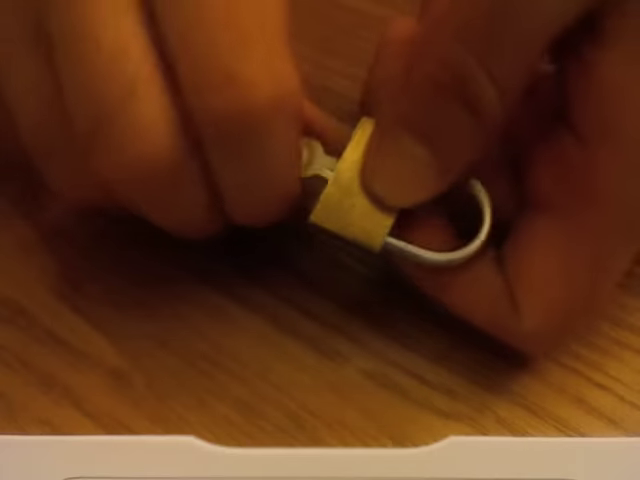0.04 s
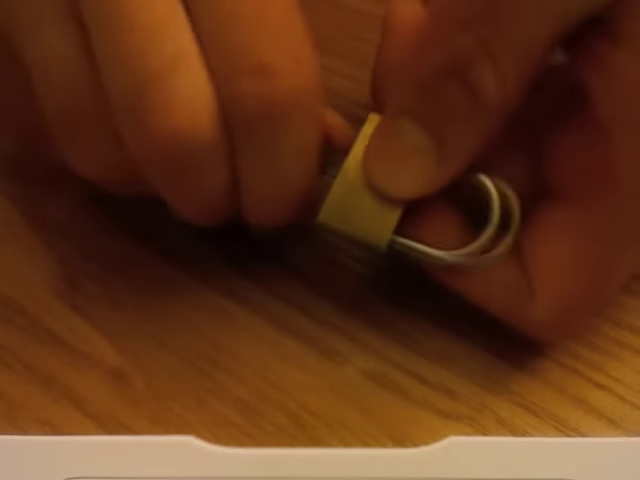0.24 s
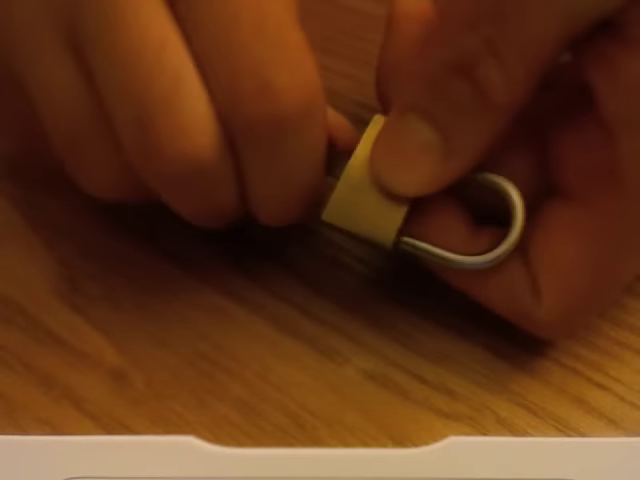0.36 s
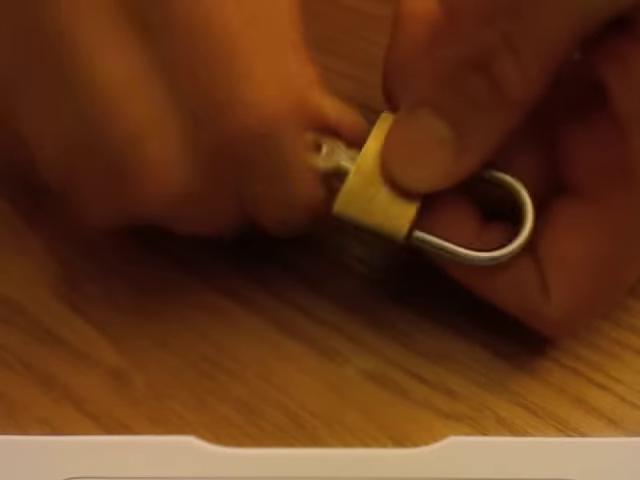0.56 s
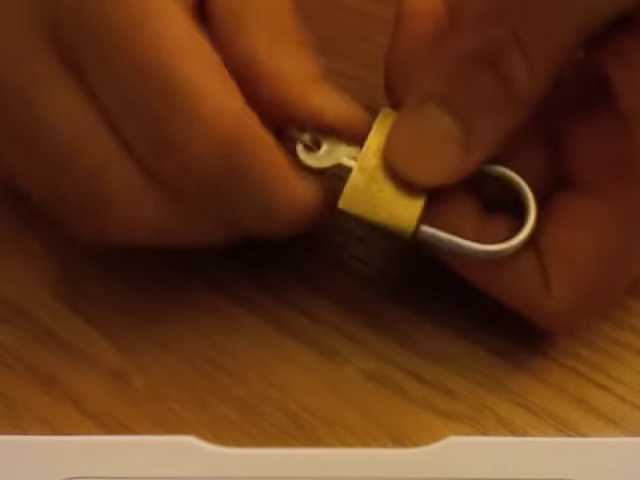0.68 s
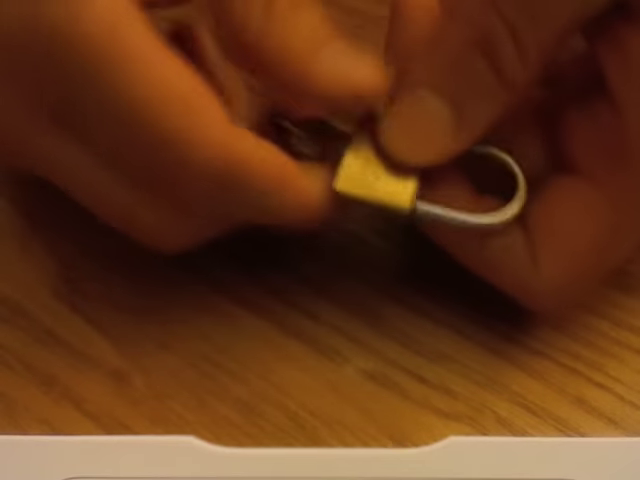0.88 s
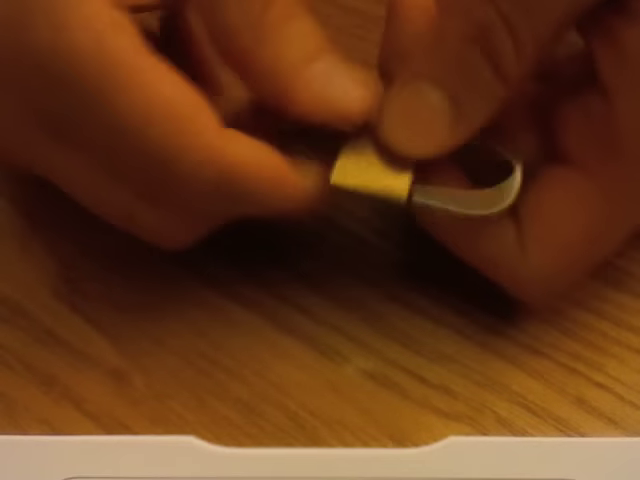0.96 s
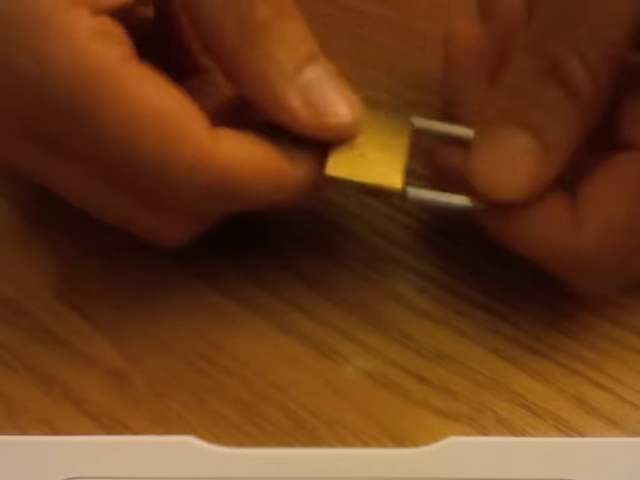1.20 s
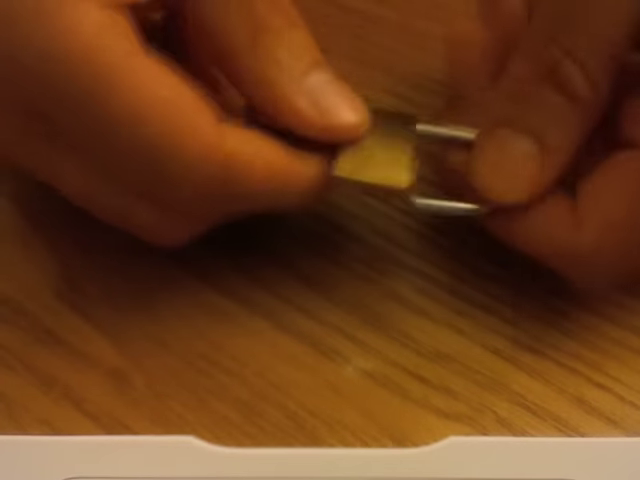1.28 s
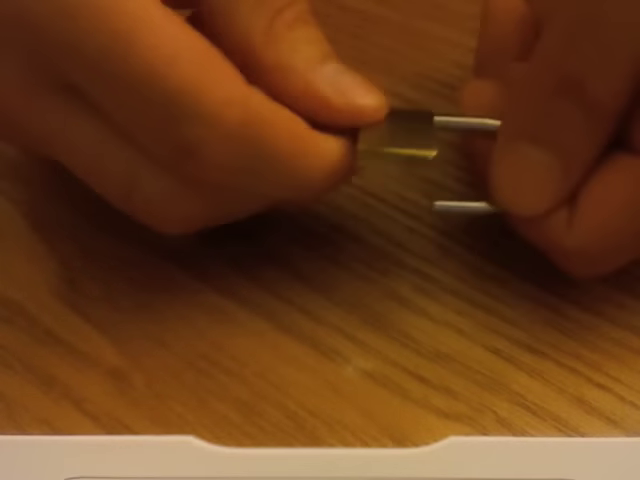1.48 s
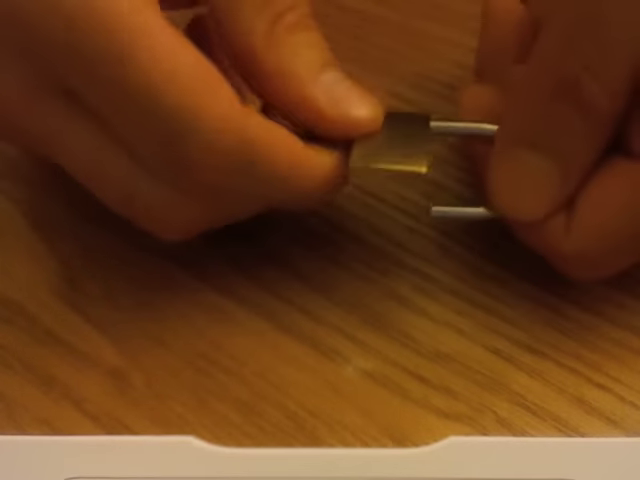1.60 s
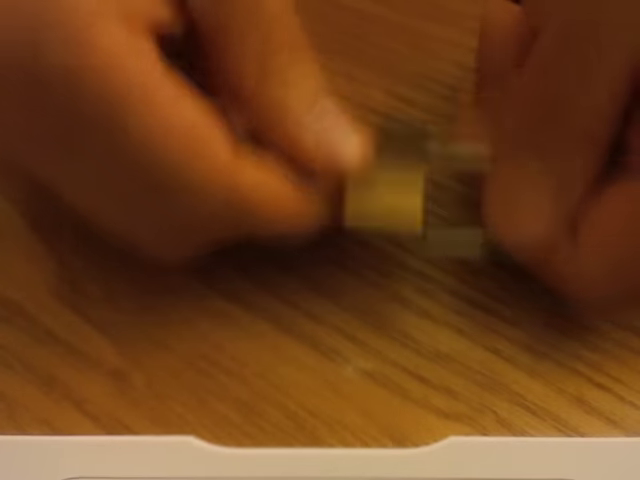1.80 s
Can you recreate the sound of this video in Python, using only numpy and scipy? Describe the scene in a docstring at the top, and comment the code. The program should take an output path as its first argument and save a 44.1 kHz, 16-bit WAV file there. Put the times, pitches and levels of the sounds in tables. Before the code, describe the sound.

A small brass padlock springs open with a sharp, bright snap. A duller clack with a thin ring follows, then light ticks of the pick and a soft rustle of hands, close by in a quiet room.

```python
"""A bright snap, a duller clack with a thin ring, then light ticks: a small brass padlock is picked.
The bolt slips and the shackle springs, then hits its stop and sets the steel pick ringing.
The lock is held in the hands, close by, above a wooden table in a quiet room.
Under it lie a rustle of the hands, a faint, pulsing electrical whine and room hiss."""
import sys
import numpy as np
from scipy import signal
from scipy.fft import rfft, irfft, next_fast_len
from scipy.io import wavfile
from scipy.ndimage import uniform_filter1d, minimum_filter1d, map_coordinates

SR = 44100
rng = np.random.default_rng(int(sys.argv[2]) if len(sys.argv) > 2 else 0)


def to_wav(s):
    """Save 16-bit WAV."""
    ch = np.atleast_2d(s).T  # columns
    pcm = np.round(np.clip(ch, -1, 1) * 32767)  # PCM
    wavfile.write(sys.argv[1], SR, pcm.astype(np.int16))


N = 81585
TIME_S = np.arange(N) / SR
FFT_SIZE = next_fast_len(N + SR // 2)
FFT_HZ = np.fft.rfftfreq(FFT_SIZE, 1 / SR)
RELEASE_S, STOP_S, ROOM_GAP_S = .2044, .5238, .006

# modes of the hand-damped lock (frequency [Hz], level [dB], t60 [s])
LOCK_MODES = [(1620, -22, .013), (2800, -22, .012), (3480, -16, .012), (4640, -13.5, .011),
              (5370, -12.5, .010), (6850, -12, .011), (7430, -9, .012), (8170, -1.5, .012),
              (8880, -6, .012), (9360, -3.5, .012), (9990, -8, .012), (10955, -11, .012),
              (12070, -10.5, .010), (13850, -9.5, .009)]
# dull modes of the opened lock in the fist (frequency [Hz], level [dB], t60 [s])
OPEN_LOCK_MODES = [(310, -52.5, 0.11), (1222, -25, 0.02), (1605, -28, 0.019), (1878, -30.5, 0.036),
                   (2580, -31.5, 0.027), (3155, -30, 0.026), (3550, -20.5, 0.01), (4300, -26.5, 0.025),
                   (5220, -21, 0.012), (7140, -17.5, 0.0067)]
# room decay (frequency [Hz], t60 [s])
ROOM_T60 = [(150, 0.072), (1000, 0.42), (4000, 0.39), (9000, 0.44), (15000, 0.27)]


def snap():
    """The bolt scrapes free and the shackle springs: a crack, the lock's short modes and a thump."""
    # bolt and shackle contacts (time [s], level [dB])
    contacts = [(.2008, -22), (.2020, -23), (.2031, -17), (.2044, 0), (.2060, -4), (.2071, -11)]
    # contact noise (frequency [Hz], level [dB])
    crack_colour = [(40, -11), (200, -8), (370, -11.5), (750, -25), (1400, -5.5), (2450, -12.5), (3600, -3),
                    (6200, 1), (8500, 4), (11000, -2.5), (15500, -1.5)]
    # recoil into the hands (frequency [Hz], level [dB], t60 [s])
    recoil_modes = [(186, -40.5, .035), (340, -40.5, 0.036)]
    crack_db, crack_t60_s, lock_db = -4, .0096, 1.8
    crack = bursts([(s, db + crack_db, crack_t60_s) for s, db in contacts], crack_colour)
    return crack + amp(lock_db) * ring(RELEASE_S, LOCK_MODES) + ring(RELEASE_S, recoil_modes)


def clack():
    """The shackle hits its stop, rebounds and knocks the opened lock."""
    # the blow on the stop and its close echoes off the table (time [s], level [dB])
    blows = [(.5238, -7), (.5248, -4.5), (.5266, -16)]
    # blow spectrum (frequency [Hz], level [dB])
    blow_colour = [(40, -2), (300, 10), (700, 3.5), (1200, 14.5), (2500, 17), (5000, 25.5), (7200, -9),
                   (8600, 9.5), (12000, -1), (14000, -19)]
    force = np.zeros(N)
    for s, db in blows:
        force[round(s * SR)] += amp(db)
    return coloured(force, blow_colour) + ring(STOP_S, OPEN_LOCK_MODES)


def pick_ring():
    """The steel pick rings until it touches the keyway again; the room carries the note on."""
    # strikes on the pick (time [s], level [dB], free ringing [s])
    pings = [(.5245, -37.5, 0.026), (.660, -44, 0.0029), (0.768, -50.5, .002), (.916, -55, 0.006)]
    pick_hz, free_t60_s, touched_t60_s, room_db = 10650, .2, .019, -18
    note = np.zeros(N)
    for s, db, free_s in pings:
        damping = decay(s + free_s, touched_t60_s)
        note += ring(s, [(pick_hz, db, free_t60_s)]) * damping
    room_response = rng.standard_normal(N) * fade(ROOM_GAP_S, along(ROOM_T60, pick_hz))
    room_response /= np.linalg.norm(room_response)
    return note + amp(room_db) * signal.fftconvolve(note, room_response)[:N]


def pick_contacts():
    """The pick ticks on the pins and slides out of the keyway."""
    # pin contacts (time [s], level [dB], t60 [s])
    ticks = [(.1836, -37, 0.013), (.5040, -45, 0.015), (.5068, -40.5, 0.03), (.5305, -38, 0.0056),
             (.5345, -33.5, 0.0079), (.5465, -43, 0.0076), (.6572, -45, 0.017), (.6598, -37, 0.0091),
             (.9150, -51.5, 0.034), (.9295, -47, 0.036), (.9330, -57, 0.0071), (.9362, -47, 0.0094),
             (.9473, -38.5, 0.0057)]
    # tick spectrum (frequency [Hz], level [dB])
    tick_colour = [(300, -29), (3500, -19.5), (6000, -10.5), (10500, -4.5), (13000, -10.5), (15500, -24)]
    # sliding friction (time [s], level [dB])
    slide_levels = [(.52, -91), (.55, -94), (.66, -61.5), (.74, -64.5), (.85, -65), (.93, -63.5),
                    (1.02, -71)]
    # friction spectrum (frequency [Hz], level [dB])
    keyway_colour = [(300, -12), (4000, -6), (8500, -10), (10200, -6.5), (10700, -9.5), (11200, -9.5),
                     (14000, -24)]
    return bursts(ticks, tick_colour) + rub(slide_levels, keyway_colour)


def body_knocks():
    """The bolt shifts just before the snap; later the lock knocks softly in the fingers."""
    # body modes struck by the bolt (frequency [Hz], level [dB], t60 [s])
    bolt_modes = [(1250, -46, 0.034), (1770, -44.5, 0.016)]
    # knocks in the fingers (time [s], level [dB], t60 [s])
    knocks = [(.7675, -41, 0.0275), (1.838, -53, 0.06)]
    # knock spectrum (frequency [Hz], level [dB])
    knock_colour = [(100, -3.5), (700, -13), (1200, 0.5), (1900, -5), (3400, -9), (4500, -21), (14000, -31)]
    return ring(start_s=.1837, modes=bolt_modes) + bursts(knocks, knock_colour)


def echoes(sound):
    """Early reflections from the table and nearby walls."""
    # reflections (delay [s], level [dB])
    paths = [(.0108, -26), (.0138, -19.5), (.0190, -27), (.0318, -24), (.0432, -27), (.0505, -30)]
    # echo spectrum (frequency [Hz], gain [dB])
    echo_colour = [(100, 6), (1500, -3.5), (4000, -6.5), (10000, -9.5), (12500, -2), (15500, -11)]
    reflections = sum(amp(db) * np.exp(-2j * np.pi * FFT_HZ * s) for s, db in paths)
    return filtered(sound, amp(along(echo_colour, FFT_HZ)) * reflections)


def tail(start_s, colour, modes):
    """Diffuse sound of a blow: tinted by the struck modes, clumpy, each band dying at its own rate."""
    tint_db, tint_width_hz = 4, 170
    clump_db, clumps_per_s, build_s = 1.6, 380, .014
    peaks = sum(np.exp(-((FFT_HZ - mode[0]) / tint_width_hz) ** 2) for mode in modes)
    tinted = unit(filtered(noise(colour), amp(tint_db * peaks)))
    hz, frame_s, bands = signal.stft(tinted, SR, nperseg=256)
    bands = bands * decay(start_s, along(ROOM_T60, hz)[:, None], frame_s)
    wash = signal.istft(bands, SR)[1][:N]
    knots = rng.standard_normal(int(TIME_S[-1] * clumps_per_s) + 2)
    clumps = map_coordinates(knots, [TIME_S * clumps_per_s])
    onset = np.clip((TIME_S - start_s - ROOM_GAP_S) / build_s, 0, 1)
    return wash * unit(amp(clump_db * clumps)) * onset


def reverberation():
    """The room rings on after the snap and the clack."""
    # snap tail spectrum (frequency [Hz], level [dB])
    snap_colour = [(100, -5.5), (900, -21.5), (1600, -17), (4000, -11), (5000, -9), (6500, -7.5),
                   (8000, -1), (10300, -0.5), (11500, -7.5), (13000, -12.5), (15500, -13)]
    # clack tail spectrum (frequency [Hz], level [dB])
    clack_colour = [(100, -6), (850, -12), (1200, -5.5), (3500, 2.5), (5000, 2), (7000, -7), (9500, -19),
                    (11000, -14), (14000, -28)]
    snap_tail = amp(-30.5) * tail(RELEASE_S, snap_colour, LOCK_MODES)
    clack_tail = amp(-38.5) * tail(STOP_S, clack_colour, OPEN_LOCK_MODES)
    return snap_tail + clack_tail


def hands():
    """Skin rubs on the lock as the grip shifts; the hands bump the table softly."""
    # rustle (time [s], level [dB])
    rustle_levels = [(0, -66), (.06, -85), (.12, -68), (1.5, -78), (1.7, -98.5), (1.76, -61), (1.89, -50)]
    # skin friction spectrum (frequency [Hz], level [dB])
    skin_colour = [(30, -9.5), (110, -7.5), (300, -4), (600, -22.5), (2000, -19.5), (5000, -14),
                   (10000, -20.5), (15000, -28)]
    # bumps on the table (time [s], level [dB], t60 [s])
    bumps = [(.05, -57.5, 0.29), (1.57, -63.5, 0.25), (1.721, -55, 0.25), (1.835, -52, 0.19)]
    # bump spectrum (frequency [Hz], level [dB])
    bump_colour = [(25, -21.5), (70, -4.5), (140, 1), (300, -5), (600, -13.5), (8000, -57)]
    return rub(rustle_levels, skin_colour) + bursts(bumps, bump_colour)


def whine():
    """Electrical interference: one thin tone dips and swells, another pulses with a trace of hiss."""
    # continuous tone (time [s], level [dB])
    tone_levels = [(0, -64), (.55, -67), (.95, -60.5), (1.85, -59.5)]
    # hiss in each pulse (frequency [Hz], level [dB])
    buzz_colour = [(8000, -43.5), (11300, -14), (12000, 2.5), (12700, -12), (15000, -39)]
    tone_hz, pulse_hz, first_pulse_s, period_s = 15625, 8000, .0112, .0668
    tone = amp(np.interp(TIME_S, *np.transpose(tone_levels))) * np.sin(2 * np.pi * tone_hz * TIME_S)
    cycle = (TIME_S - first_pulse_s) / period_s % 1
    gate = uniform_filter1d(1.0 * (cycle < .5), size=40)
    buzz = amp(-60.3) * np.sin(2 * np.pi * pulse_hz * TIME_S) + amp(-74.5) * noise(buzz_colour)
    return tone + gate * buzz


def room_hiss():
    """Steady noise floor, strongest in the bass."""
    # hiss spectrum (frequency [Hz], relative density [dB])
    hiss_colour = [(25, -22), (124, 0.5), (154, -7), (190, -4), (304, -4), (488, -10.5), (662, -3),
                   (819, -12), (1410, -13.5), (3200, -15.5), (7000, -21.5), (10000, -22.5), (12300, -27),
                   (14500, -39), (16000, -34.5)]
    return amp(-61) * noise(hiss_colour)


def ring(start_s, modes):
    """Damped modes struck together; neighbours swing in opposite directions."""
    age_s = TIME_S - start_s
    return sum((-1) ** k * amp(db) * fade(start_s, t60_s) * np.sin(2 * np.pi * hz * age_s)
               for k, (hz, db, t60_s) in enumerate(modes))


def bursts(events, colour):
    """Dying sprays of tiny impacts."""
    force = sum(amp(db) * fade(s, t60_s) * np.sign(rng.standard_normal(N)) for s, db, t60_s in events)
    return coloured(force, colour)


def rub(levels, colour):
    """Friction noise following (time [s], level [dB]) points; silent outside them."""
    level_db = np.interp(TIME_S, *np.transpose(levels), left=-np.inf, right=-np.inf)
    return amp(level_db) * noise(colour)


def coloured(force, colour):
    """Force through a minimum-phase filter of unit energy."""
    cepstrum = irfft(np.log(unit(amp(along(colour, FFT_HZ)))), FFT_SIZE)
    cepstrum[1:FFT_SIZE // 2] *= 2
    cepstrum[FFT_SIZE // 2 + 1:] = 0
    return filtered(force, np.exp(rfft(cepstrum)))


def noise(colour):
    """Coloured noise of rms 1."""
    return unit(filtered(rng.standard_normal(N), amp(along(colour, FFT_HZ))))


def filtered(x, response):
    """Apply a complex response given at FFT_HZ."""
    return irfft(rfft(x, FFT_SIZE) * response, FFT_SIZE)[..., :N]


def decay(start_s, t60_s, time_s=TIME_S):
    """Unity until start_s, then exponential decay."""
    return amp(-60 * np.maximum(time_s - start_s, 0) / t60_s)


def fade(start_s, t60_s):
    """Sudden onset, then exponential decay."""
    return (TIME_S >= start_s) * decay(start_s, t60_s)


def along(points, hz):
    """Interpolate (frequency [Hz], value) points on a log axis."""
    point_hz, values = np.transpose(points)
    return np.interp(np.log(hz + 1), np.log(point_hz + 1), values)


def amp(db):
    """Decibels to gain."""
    return 10 ** (np.asarray(db) / 20)


def unit(x):
    """Scale to rms 1."""
    return x / np.sqrt(np.mean(x ** 2) + 1e-20)


def scene():
    """Lock, room and background reach two closely spaced microphones, the right one slightly first."""
    right_lead_s, side_hiss_db = 1.2e-5, -24
    release, stop = snap(), clack()
    room = echoes(amp(-2) * release + amp(10.5) * stop) + reverberation()
    lock = release + stop + body_knocks() + pick_contacts() + pick_ring()
    mid = lock + room + hands() + whine() + room_hiss()
    sides = np.array([[-1], [1]])
    pair = filtered(mid, np.exp(1j * np.pi * FFT_HZ * right_lead_s * sides))
    return pair + sides * amp(side_hiss_db) * room_hiss()


def record(dry):
    """A fast limiter flattens the snap; a steep low-pass cuts the highest treble."""
    ceiling, top_hz, rolloff_hz = 1.0, 16150, 400
    needed_gain = ceiling / np.maximum(np.abs(dry).max(axis=0), ceiling)
    gain = uniform_filter1d(minimum_filter1d(needed_gain, size=7), size=7)
    return filtered(dry * gain, np.clip((top_hz - FFT_HZ) / rolloff_hz, 0, 1))


dry = scene()
out = record(dry)
to_wav(out)
```